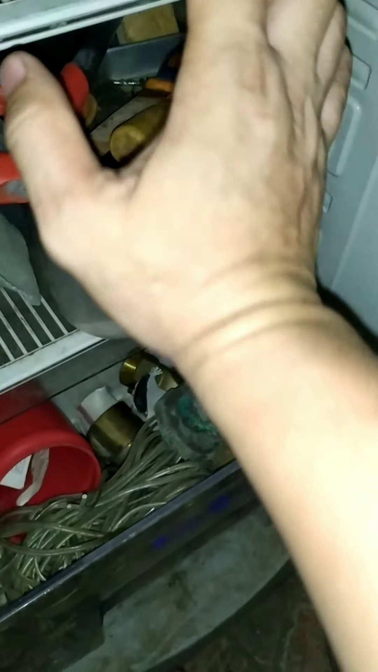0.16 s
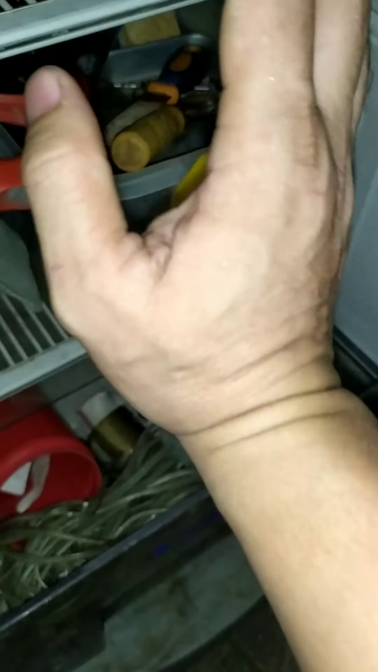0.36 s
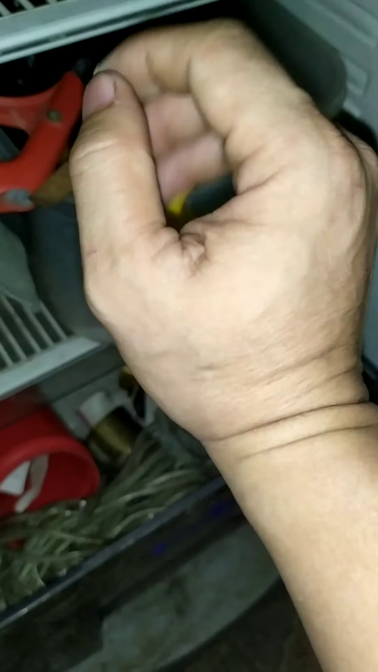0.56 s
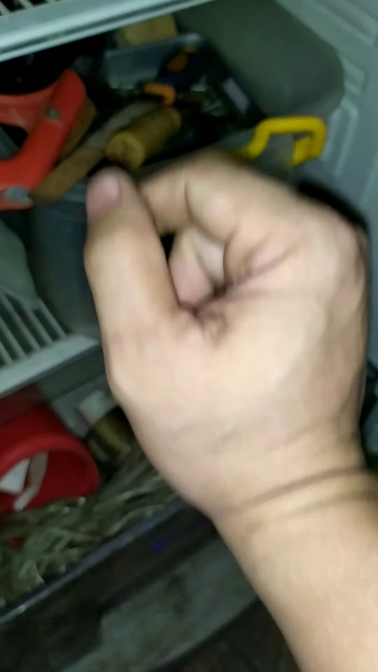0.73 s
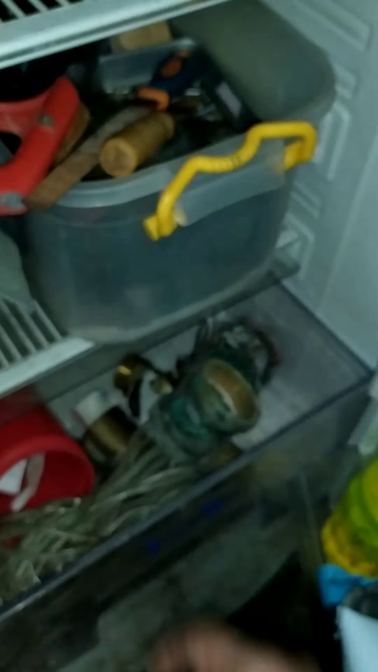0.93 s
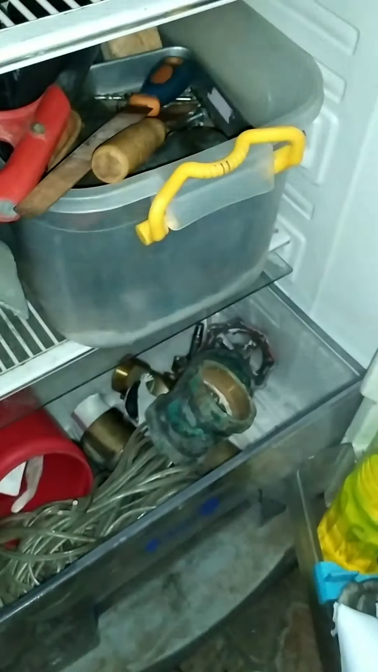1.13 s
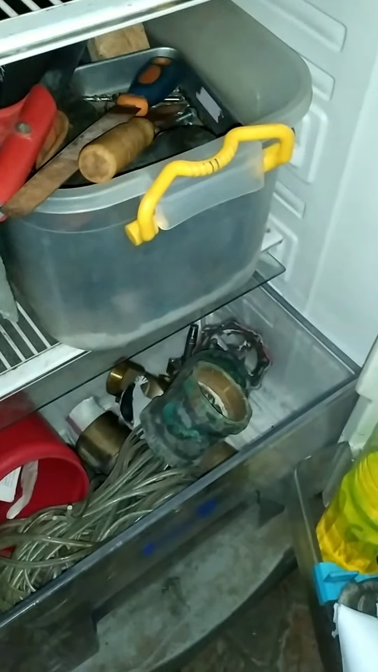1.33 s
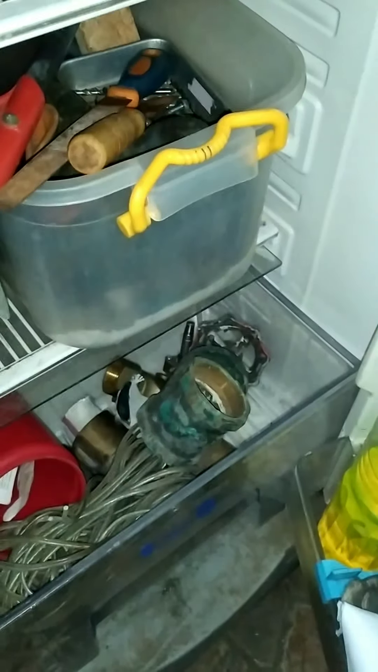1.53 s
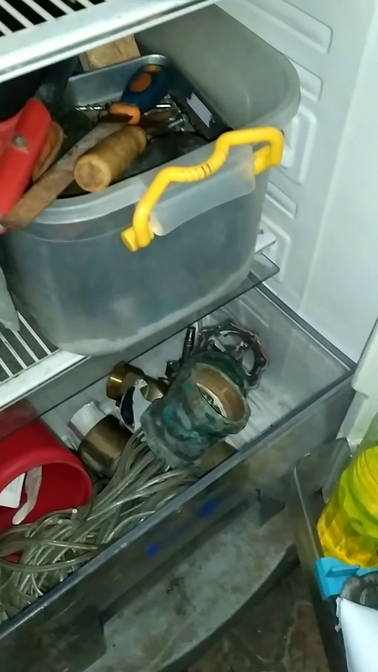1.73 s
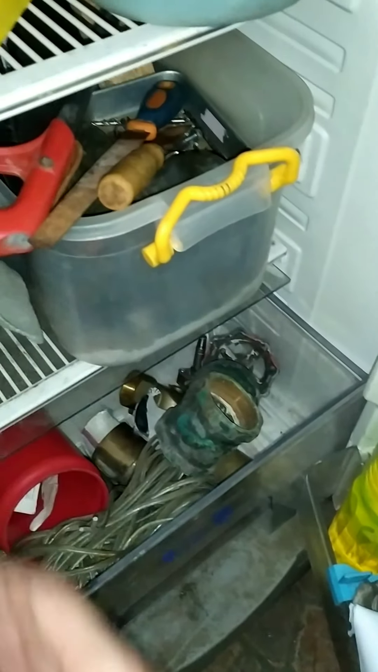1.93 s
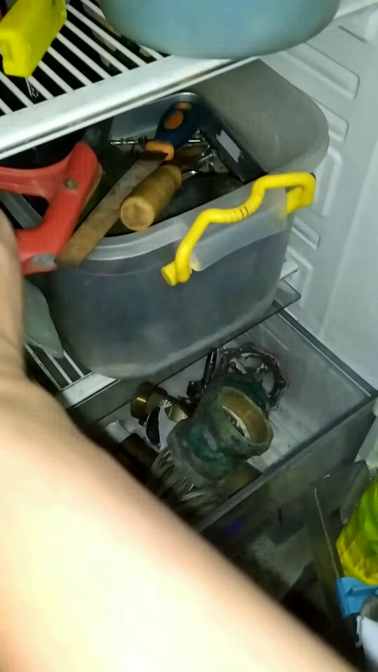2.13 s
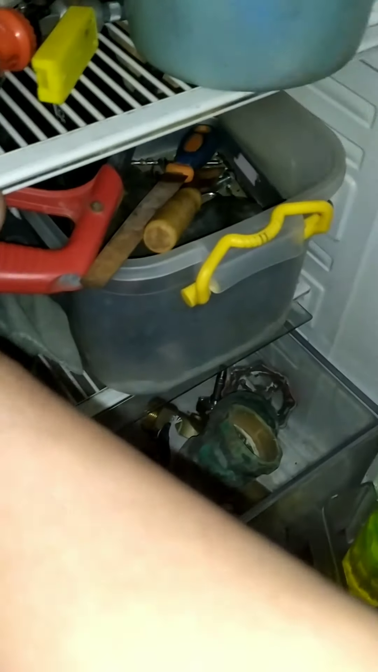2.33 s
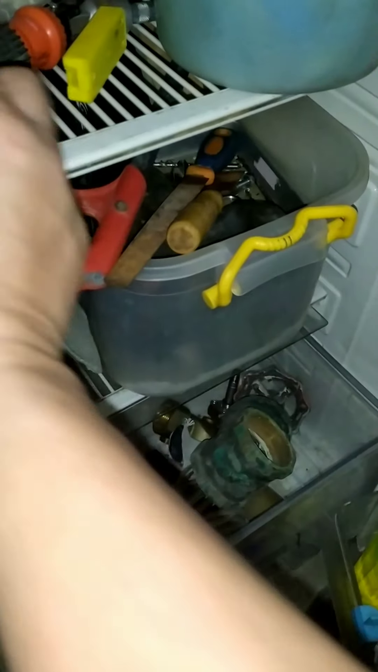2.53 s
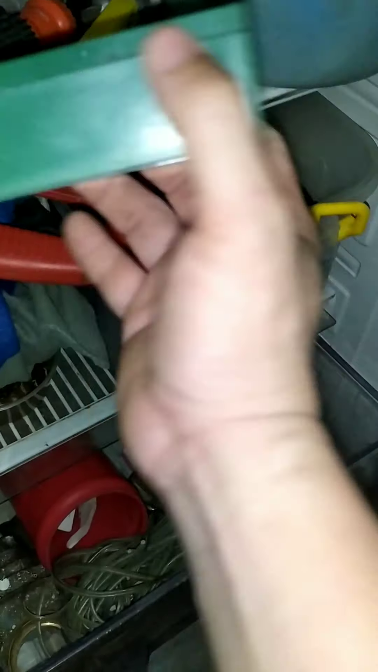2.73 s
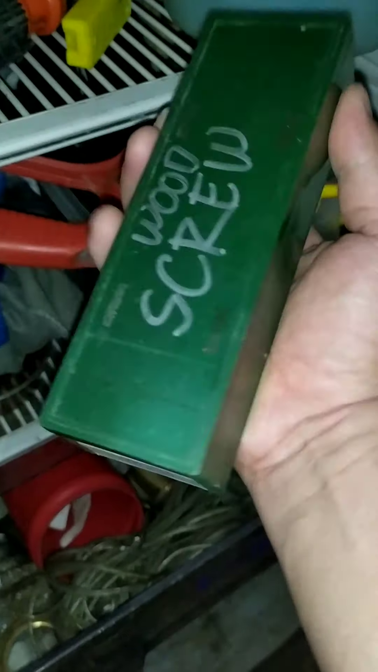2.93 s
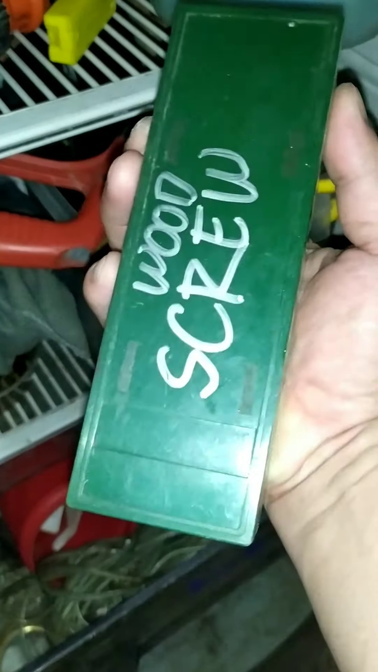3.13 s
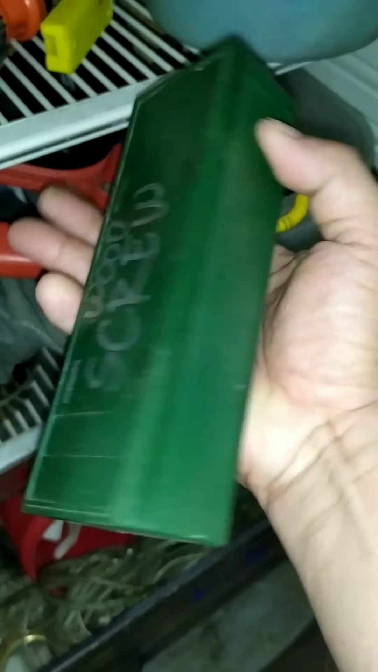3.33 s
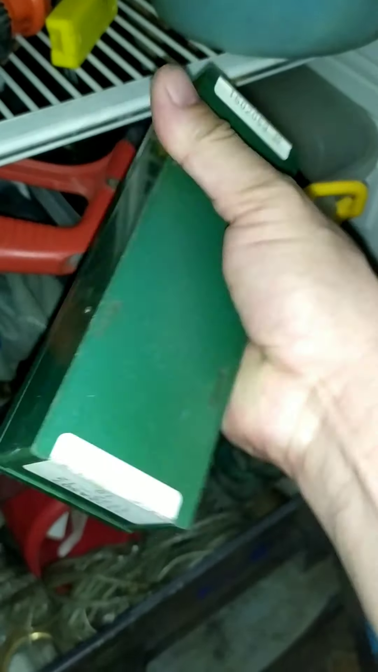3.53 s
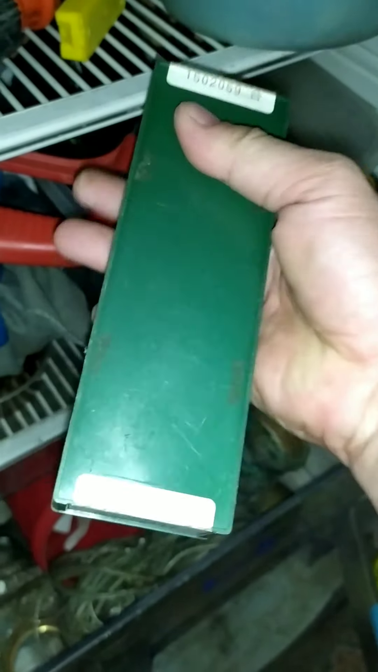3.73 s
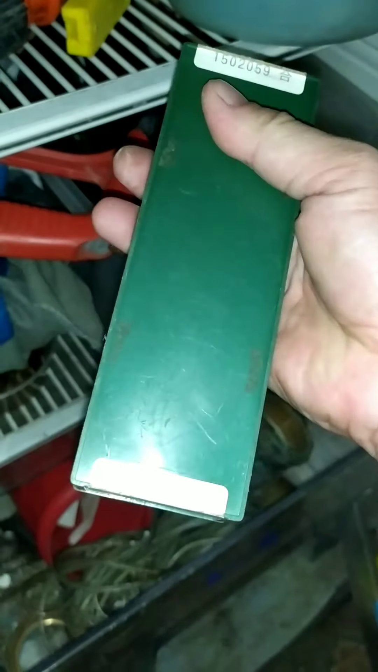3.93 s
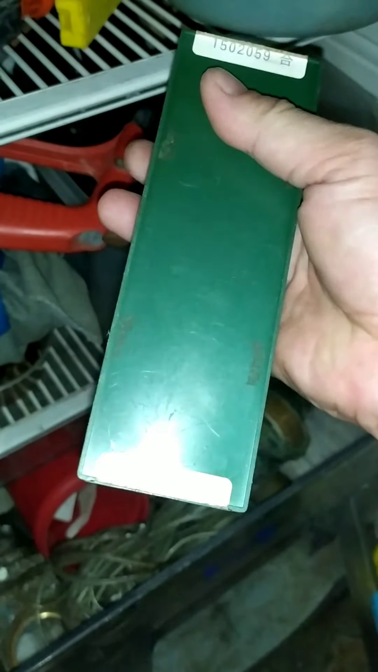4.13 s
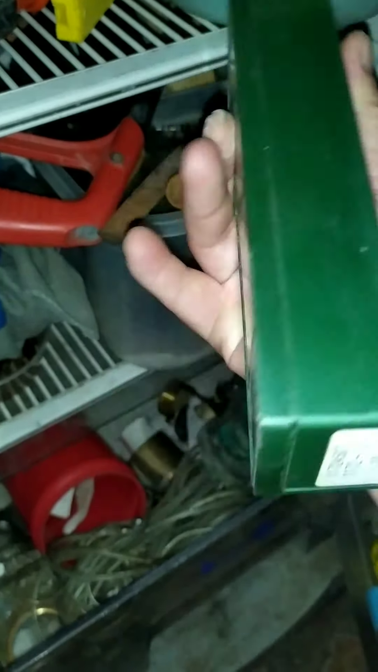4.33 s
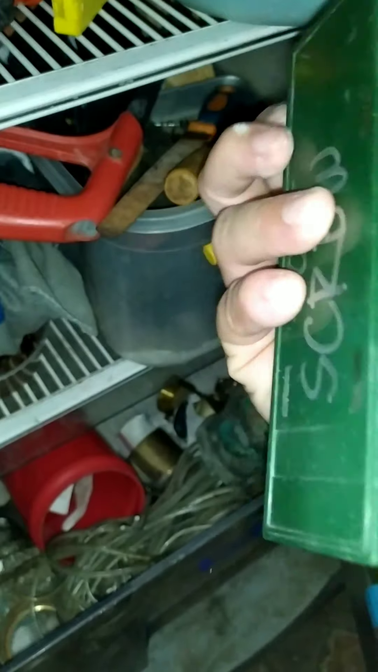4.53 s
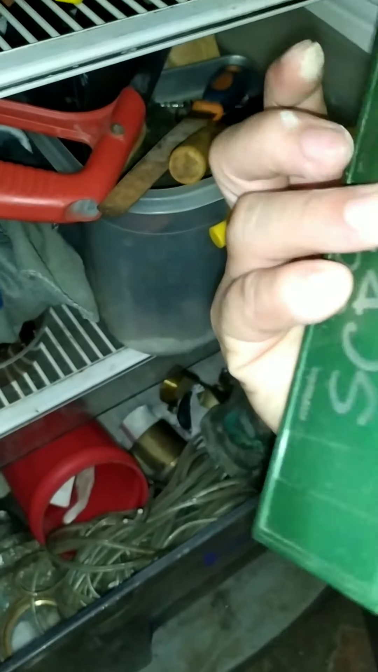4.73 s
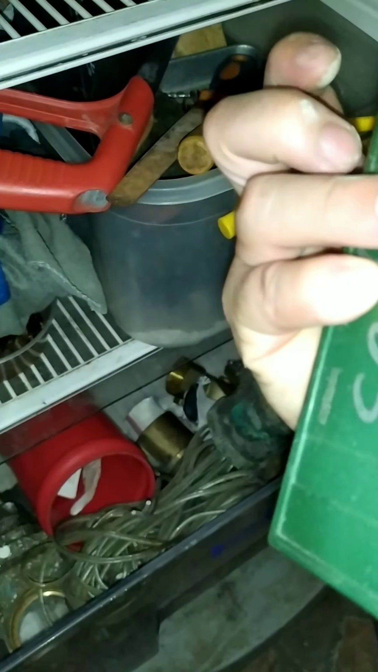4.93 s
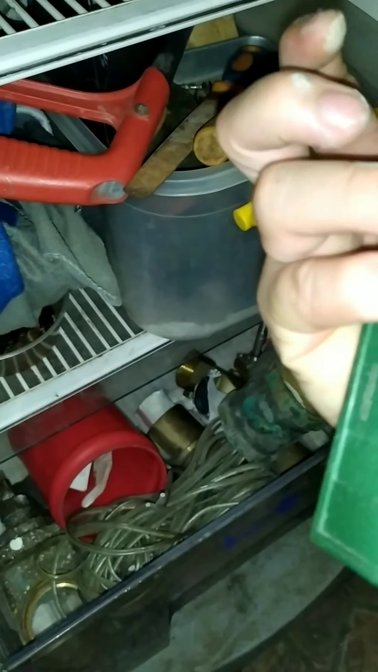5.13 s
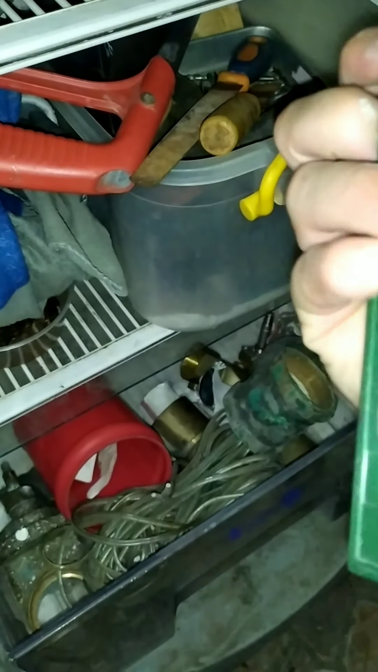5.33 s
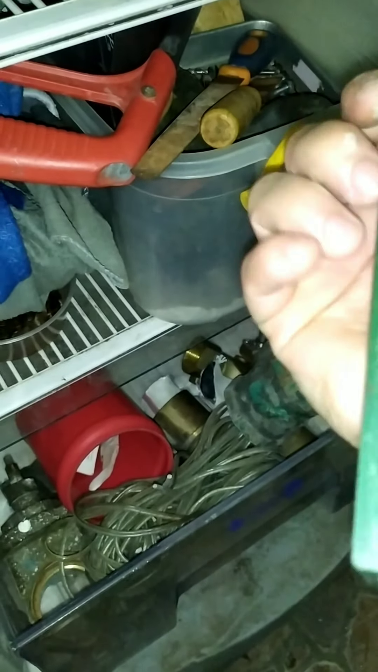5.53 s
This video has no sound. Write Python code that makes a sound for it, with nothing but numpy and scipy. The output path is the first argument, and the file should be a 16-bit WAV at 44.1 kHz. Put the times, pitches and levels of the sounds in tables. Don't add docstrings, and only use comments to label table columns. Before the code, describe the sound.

Hard plastic knocks and jostling tools, a faint squeak, then a long box of screws rattling loudly in two bursts.

```python
import sys
import numpy as np
from scipy import signal
from scipy.fft import rfft, irfft
from scipy.io import wavfile
from scipy.ndimage import uniform_filter1d

SR = 44100
rng = np.random.default_rng(int(sys.argv[2]) if len(sys.argv) > 2 else 0)


def transcribe(signal):
    frames = np.atleast_2d(signal).T
    limited = np.clip(frames, -1, 1)
    pcm = np.round(limited * 32767).astype(np.int16)
    wavfile.write(sys.argv[1], SR, pcm)


def how_loud(loudness_db):
    steps = np.asarray(loudness_db, float) / 20
    return 10 ** steps


N = 246078

# (frequency [Hz], density [dB per Hz])
HUM_COLOUR = [(15, -45), (25, -22.5), (59, -3.5), (116, -5.5), (143, -15), (316, -17.5), (347, -14.5),
              (437, -20), (839, -26.5), (3630, -34), (6500, -32), (8450, -65), (14300, -120)]
# (first [s], last [s], peak [dB], left-right [dB])
CHIRP_RUNS = [(.0282, .23, -38, -1), (.3672, .6687, -38.5, 3.5), (.7632, .8595, -38, 4),
              (.9595, 1.059, -38, 4), (1.1563, 1.254, -35, 4), (1.367, 1.467, -37, 2),
              (1.575, 1.575, -38, 2), (1.6775, 1.7768, -33.5, 2), (1.873, 1.969, -36, 3),
              (2.067, 2.1632, -37, 3), (2.2643, 2.458, -41, 6), (2.556, 3.04, -42, 2),
              (3.1394, 3.3304, -39.5, 1.5), (3.43, 3.82, -42, 1), (3.919, 4.303, -42, 2),
              (4.4, 4.886, -42, 1), (4.984, 5.3763, -39.5, .5), (5.474, 5.572, -41, 0)]
# (time after start [s], level [dB])
WING_STROKES = [
    (-.0135, -15),
    (0, 0),
    (.0165, 3.5),
]
# (delay [s], level [dB])
WALL_ECHOES = [
    (0, 0),
    (.0036, -7),
    (.011, -12),
    (.017, -18),
    (.025, -16),
]
# (time [s], pitch [Hz], level [dB])
SQUEAKS = [
    [(1.38, 11100, -80), (1.432, 12880, -72), (1.454, 13450, -72), (1.5, 13000, -71), (1.538, 12650, -72),
     (1.572, 12800, -73), (1.62, 11250, -72), (1.658, 10060, -74), (1.69, 9000, -80)],
    [(1.79, 9920, -72), (1.818, 10280, -71), (1.864, 10950, -76), (1.915, 11000, -75), (1.975, 11800, -77),
     (2.02, 11550, -79), (2.06, 11200, -84)],
]
# (pitch ratio [1], level [dB])
SQUEAK_STRANDS = [
    [(1, 0), (1.085, -5), (.76, -8)],
    [(1, 0), (1.165, -3), (.935, -5)],
]
# (time [s], peak [dB], t60 [s])
SHELF_THUDS = [(.095, -23, .085), (.13, -22, .14), (.177, -30.5, .12), (.225, -35, .09),
               (.264, -25.5, .047), (1.266, -45, .13), (2.331, -48, .16), (2.392, -42, .23),
               (2.462, -44, .2), (2.481, -36, .08), (2.56, -41, .3), (2.59, -41, .2), (2.615, -42, .1),
               (2.7, -43, .09), (2.742, -23, .18), (2.798, -24, .07)]
# (time [s], peak [dB], frequency [Hz])
PANEL_BOOMS = [(.087, -17, 234), (.099, -21, 264), (.128, -14, 264), (.135, -17.5, 277), (.175, -21.5, 266),
               (.227, -25, 277), (.244, -31, 253), (1.274, -45, 229), (2.58, -46, 240), (2.6, -44, 600),
               (2.65, -45, 640), (2.7, -45, 620), (3.5, -33, 230), (3.56, -35, 250), (4.45, -40, 240),
               (4.55, -41, 250), (2.741, -28, 540), (2.743, -32, 300), (2.752, -31, 390), (2.744, -30, 680),
               (2.964, -46, 620), (3.555, -17, 1470), (3.564, -18, 1500), (3.571, -20, 1440),
               (.09, -27, 720), (.099, -29, 600), (.176, -29, 680), (.231, -35, 520), (3.49, -24, 560),
               (4.382, -33, 420), (4.72, -33, 450), (3.64, -35, 235), (3.7, -38, 260), (4.75, -36, 215),
               (5.365, -55, 800), (3.481, -21.5, 549), (3.512, -19.5, 595), (3.624, -26.5, 600),
               (4.423, -30.5, 536), (4.426, -27, 1050), (4.691, -38, 530), (4.744, -33.5, 533),
               (4.906, -40.5, 269), (5.563, -33, 541)]
# (peak time [s], peak [dB], swell [s per 60 dB], fade [s per 60 dB])
HAND_RUBS = [
    (1.285, -56, .04, .35),
    (1.315, -54, .2, .3),
    (1.355, -60, .2, .03),
    (5.17, -65, .1, .1),
    (5.38, -60, .2, .4),
    (.424, -52, .04, .06),
    (2.478, -50, .06, .08),
    (2.58, -46, .3, .4),
]
# (frequency [Hz], density [dB per Hz])
RUB_COLOUR = [(150, -10), (700, -13), (1500, -15), (6000, -11), (10000, -6), (15000, -3), (16000, -20)]
# (time [s], peak [dB], ring [Hz], t60 [s], left-right [dB])
KNOCKS = [(0.0424, -49, 2200, 0.032, 3.5), (0.0862, 2, 3800, 0.032, -5), (0.1044, -20.5, 4200, 0.07, 4.5),
          (0.1275, -19, 1300, 0.03, 0), (0.1315, -12, 2800, 0.033, -6), (0.0885, -10, 2500, 0.03, 0),
          (0.1915, -18, 3700, 0.03, 0), (0.2312, -10, 2700, 0.025, 0), (0.1745, 0, 3650, 0.033, -0.5),
          (0.2259, -9.5, 3700, 0.043, -4), (0.2404, -14, 2946, 0.035, -8.5), (0.256, -26, 4400, 0.04, 0),
          (0.2824, -27, 2900, 0.04, -0.5), (0.2932, -23, 4900, 0.025, -3.5), (0.13, -20, 2000, 0.03, 0),
          (0.158, -33, 3000, .04, 0), (0.204, -28, 3500, .04, 0), (0.271, -25, 3600, .04, 0),
          (1.27, -37, 1600, 0.1, 3)]
# (frequency [Hz], density [dB per Hz])
TUB_COLOUR = [(180, -27.5), (300, -10), (400, -19), (943, -22), (1930, -18.5), (2600, -10.5), (3120, -12.5),
              (3800, -9), (5300, -16), (10300, -15), (14400, -19), (15900, -34.5)]
# (peak time [s], peak [dB], swell [s per 60 dB], fade [s per 60 dB])
TUB_JOSTLE = [
    (.086, -19, .012, .21),
    (.176, -17, .02, .075),
    (.23, -20, .04, .13),
    (.28, -34, .2, .17),
    (.19, -30, .05, .25),
    (.3, -41, .1, .12),
    (.35, -53, .2, .2),
]
# (peak time [s], peak [dB], swell [s per 60 dB], fade [s per 60 dB])
SCREW_SLIDES = [(2.51, -43, .08, .6), (2.64, -34, .4, .9), (2.744, -22.5, .02, .11), (2.8, -42, .3, .8),
                (2.94, -41, .9, .1), (2.968, -18, .06, .35), (3.05, -22, .3, .07), (3.128, -32.5, .3, .125),
                (3.22, -46, .05, .13), (3.386, -32.5, .085, .9), (3.488, -10.5, .04, .47),
                (3.562, -11.5, .25, .26), (3.645, -14, .05, .4), (3.685, -22, .2, .25),
                (3.73, -25, .2, .25), (3.82, -31, .4, .26), (4.372, -25, .03, .9), (4.412, -19, .14, .15),
                (4.685, -26, .3, .1), (4.432, -21.5, .13, .42), (4.535, -20, .15, .48), (4.61, -25, .3, .3),
                (4.742, -20, .5, .05), (4.78, -26.5, .3, .04), (4.33, -52, .08, .3), (4.871, -37, .3, .05),
                (4.89, -33, .03, .03), (4.96, -57, .48, .2), (5.42, -55, .35, .3), (5.484, -33, .08, .4),
                (5.575, -24, .06, .3)]
# (frequency [Hz], density [dB per Hz])
BOX_COLOUR = [(88, -46.5), (150, -32), (254, -19), (465, -17), (599, -9), (1010, -16.5), (1500, -3.5),
              (1680, -8.5), (2170, -0.5), (2600, -1.5), (3350, -7.5), (4380, -2), (9370, -15), (15900, -26)]
# (time [s], peak [dB],
# ring [Hz], left-right [dB])
DRAW_CLACKS = [(2.3815, -43.5, 1820, .5), (2.4017, -38, 2170, -6), (2.5339, -32, 1570, -2),
               (2.6346, -24.5, 1705, 6), (2.549, -36, 1300, 0), (2.569, -34, 1800, 0),
               (2.577, -34, 1250, 0), (2.596, -31, 1900, 0), (2.614, -30, 1400, 0), (2.671, -29, 1300, 0),
               (2.706, -27, 1250, 0), (2.723, -28, 1300, 0), (3.02, -12, 2400, 0), (2.6514, -26, 1830, -.5),
               (2.6886, -31, 2470, 3.5), (2.72, -27, 2470, 3), (2.742, -20.5, 2640, .5),
               (2.855, -12.5, 3760, -2.5), (2.757, -26, 2000, 0), (2.8251, -32, 3780, 0),
               (2.43, -42, 2000, 0), (2.465, -41, 1950, 0), (2.6984, -27, 2420, 3.5), (2.709, -27, 4500, 0),
               (2.9588, -18, 3740, .5), (3.058, -18, 2100, 0), (3.093, -26, 2050, .5),
               (2.8824, -24.5, 4170, -1.5), (2.9275, -29, 5100, 3.5), (2.9655, -3.5, 4230, 0),
               (2.9795, -5, 3300, 0), (3.24, -38, 2100, 0), (2.9746, -7, 4180, -10),
               (3.0052, -12, 2740, 2.5), (3.0298, -19, 2200, -4), (3.0523, -14, 1930, .5),
               (3.1171, -25.5, 2850, 3), (3.2164, -37, 2070, .5), (1.274, -37, 1740, -5),
               (1.2894, -35, 1710, -1)]
# (time [s], peak [dB], ring [Hz], left-right [dB])
TIP_CLACKS = [(3.3732, -29, 2120, 3), (3.381, -28, 2020, .5), (3.412, -14, 1970, 3.5),
              (3.4788, -10, 1400, 1), (3.4829, -11, 1330, 1.5), (3.431, -28, 2200, 0),
              (3.597, -12, 2300, 0), (3.609, -13, 2400, 0), (3.621, -17, 2200, 0), (3.886, -33, 3000, 0),
              (3.4863, -8, 2350, -8), (3.4915, -6, 2300, .5), (3.4968, -7, 2500, 0),
              (3.5028, -5.5, 1260, -1.5), (3.5147, -11, 1215, 2.5), (3.543, -3, 4420, 3),
              (3.5507, -4, 1567, 2), (3.5645, -4, 1530, 6.5), (3.5817, -10.5, 2250, 4),
              (3.5545, -5, 4500, 0), (3.5755, -8, 1500, 0), (3.6315, -3.5, 4980, 2.5),
              (3.642, -10, 2500, 1), (3.662, -14, 2500, 0), (3.674, -13, 2500, 0), (3.688, -19, 2500, 0),
              (3.7252, -9, 2400, 0), (3.7565, -13, 2300, 0), (3.767, -12, 2500, 0), (3.851, -26, 3600, 0),
              (3.6992, -9.5, 2480, -2), (3.7053, -9, 2470, -1.5), (3.7225, -9, 4630, -1.5),
              (3.7434, -8, 2480, -1), (3.764, -12, 2545, 3), (3.7775, -9, 2500, 0), (3.8018, -18, 2840, 4),
              (3.8159, -17, 2680, 0), (3.8374, -24, 3760, 5), (3.9658, -35.5, 2490, 5),
              (3.9867, -39, 3710, 6)]
# (time [s], peak [dB], ring [Hz], left-right [dB])
BACK_CLACKS = [(4.3352, -31, 2800, 12), (4.3696, -17, 2170, 3.5), (4.393, -17, 2480, .5),
               (4.4097, -15, 2590, -7.5), (4.4155, -11, 2500, 0), (4.4262, -7, 2060, 4),
               (4.4378, -5.5, 4220, 4), (4.4435, -8, 6500, 0), (4.5045, -13, 2300, 0),
               (4.468, -6, 2300, -1.5), (4.4845, -8, 2080, 0), (4.455, -14, 2300, 0), (4.59, -15, 2300, 0),
               (4.668, -22, 2200, 0), (4.803, -34, 2100, 0), (4.5245, -3.5, 4750, -1.5),
               (4.5375, -8, 1540, 5.5), (4.5555, -11, 2300, 0), (4.561, -10, 4270, 2),
               (4.5743, -9.5, 4700, 4.5), (4.6044, -12, 2310, 2), (4.6135, -14, 2200, 0),
               (4.6915, -13, 2300, 0), (4.7235, -12, 4300, 0), (4.735, -14, 2400, 0), (4.745, -12, 1900, 0),
               (4.779, -18, 3800, 0), (4.8701, -27, 2590, 4), (4.6331, -11, 2140, 2),
               (4.6776, -18, 2180, 3.5), (4.701, -11, 2955, 3), (4.6985, -3, 4300, -1.5),
               (4.718, -15, 4420, 5), (4.7704, -16.5, 1960, -2.5), (4.8369, -24, 2080, 0),
               (4.8477, -21.5, 2590, 2.5), (4.886, -14, 2790, 6), (5.3675, -38.5, 2030, -2.5),
               (5.4159, -32, 2210, 4), (5.4734, -37, 2380, 0), (5.479, -33, 2200, 0), (5.547, -36, 2300, 0),
               (5.4832, -17, 2090, 5.5), (5.5064, -18.5, 2140, 2.5), (5.5214, -21.5, 2230, 0),
               (5.5635, -25, 2590, -.5), (5.567, -24, 2300, 0), (5.5762, -8, 1900, 3)]
# (frequency [Hz], coherence [1])
PORT_LIKENESS = [(100, 0.93), (400, 0.75), (800, .75), (1500, 0.36), (3000, 0.24), (12000, .35)]
# (frequency [Hz], left-right [dB])
PORT_TILT = [(60, 1.5), (130, -2), (290, -1), (640, -4), (1410, 0.5), (3100, 4), (6820, -2), (15000, -3.5)]
PORT_LAG_S = -.00011


def evened(x):
    return x / np.sqrt(np.mean(x ** 2) + 1e-20)


def read(points, hz):
    f, value = np.transpose(points)
    return np.interp(np.log(hz + 1), np.log(f + 1), value)


def add(mix, at_s, sound):
    part = mix[:, round(at_s * SR):][:, :sound.shape[-1]]
    part += sound[..., :part.shape[1]]


def sides(pan_db):
    return how_loud(np.array([[.5], [-.5]]) * pan_db)


def fall(t, t60_s):
    return how_loud(-60 * t / t60_s)


def ports(pair, colour, lag_s=PORT_LAG_S):
    hz = np.fft.rfftfreq(pair.shape[1], 1 / SR)
    left, other = rfft(pair) * how_loud(read(colour, hz))
    same = np.clip(read(PORT_LIKENESS, hz), 0, 1)
    shift = np.exp(-2j * np.pi * hz * lag_s)
    right = same * shift * left + np.sqrt(1 - same ** 2) * other
    return irfft(np.array([left, right]), pair.shape[1])


def room(x, t60_s):
    t = np.arange(SR // 2) / SR
    tail = rng.standard_normal((2, len(t))) * fall(t, t60_s) * (t > .003)
    return signal.fftconvolve(x, tail / np.linalg.norm(tail[0]), axes=1)[:, :N]


def ring(hz, t60_s, rise_s, lag_s=PORT_LAG_S, size=6000):
    t = np.arange(size) / SR
    return np.sin(2 * np.pi * hz * (t - [[0], [lag_s]])) * fall(t, t60_s) * (1 - np.exp(-t / rise_s))


def surges(rows, s):
    at, db, swell, fade = np.array(rows).T[:, :, None]
    shape_db = db - 60 * np.where(s < at, (at - s) / swell, (s - at) / fade)
    return 10 * np.log10(np.sum(how_loud(shape_db) ** 2, axis=0) + 1e-14)


def hum():
    hiss = [(8200, -33), (8800, -55), (9900, -52), (10800, -41), (14500, -39), (16000, -42)]
    far_band = [(6000, -38.5), (6900, -14), (7300, -3), (7700, -4), (8100, -7), (8500, -24), (9200, -40)]
    floor = evened(ports(rng.standard_normal((2, N)), HUM_COLOUR[:-1] + hiss))
    far = evened(ports(rng.standard_normal((2, N)), far_band))
    return how_loud(-54.5) * floor + how_loud(-61) * far


def cricket():
    out, t = np.zeros((2, N)), np.arange(300) / SR
    glide = 2 * np.pi * np.cumsum(8020 - 140000 * t) / SR
    width_s = np.where(t < .0025, .0009, .0014)
    shape = np.exp(-.5 * ((t - .0025) / width_s) ** 2)
    gap_s = .098
    for first, last, run_db, pan_db in CHIRP_RUNS:
        for s in np.linspace(first, last, round((last - first) / gap_s) + 1):
            chirp_db = run_db + 1.1 * rng.standard_normal()
            for after_s, stroke_db in WING_STROKES:
                for late_s, echo_db in WALL_ECHOES:
                    echoed = late_s > 0
                    phase = (2 * np.pi if echoed else 2.8) * rng.random((2, 1))
                    wobble_db = echoed * 1.5 * rng.standard_normal((2, 1))
                    gain = how_loud(chirp_db + 1.6 + stroke_db + echo_db + wobble_db) * sides(pan_db)
                    start_s = max(s + after_s + late_s - .0008, 0)
                    add(out, start_s, gain * shape * np.sin(glide + phase))
    return out + how_loud(-6) * room(out, .15)


def hinge():
    out = np.zeros((2, N))
    for curve, strands in zip(SQUEAKS, SQUEAK_STRANDS):
        at, hz, db = np.transpose(curve)
        t = np.arange(at[0], at[-1], 1 / SR)
        for ratio, strand_db in strands:
            noise = rng.standard_normal((2, len(t)))
            waver, flutter = (evened(uniform_filter1d(v, size=200)) for v in noise)
            turns = np.cumsum(ratio * np.interp(t, at, hz) + 55 * waver) / SR
            level = how_loud(np.interp(t, at, db) + strand_db + 4.5 + 2.5 * flutter)
            fades = signal.windows.tukey(len(t), .15)
            add(out, at[0], level * fades * np.sin(2 * np.pi * turns))
    return out + how_loud(-6) * room(out, .06)


def thuds():
    out = np.zeros((2, N))
    shelf_hz, tub_t60_s, box_t60_s = 115, .048, .068
    for s, db, t60_s in SHELF_THUDS:
        add(out, s, how_loud(db + 6) * ring(shelf_hz, t60_s, rise_s=.006))
    for s, db, hz in PANEL_BOOMS:
        t60_s = tub_t60_s if hz < 400 else box_t60_s
        add(out, s, how_loud(db + 6) * ring(hz, t60_s, rise_s=.0015))
    return out


def rattle(rows, colour, per_s, spread_db, t60_s, boom_per_db, edge_per_db, count=11):
    out, t = np.zeros((2, N)), np.arange(1200) / SR
    size = how_loud(spread_db * np.minimum(rng.exponential(1, N), 4)) * (rng.random(N) < per_s / SR)
    clumps = evened(uniform_filter1d(rng.standard_normal(N), size=300))
    size *= how_loud(1.5 * clumps)
    kind = rng.integers(0, count, N)
    for k in range(count):
        hz = rng.uniform(150, 16000, (2, 16, 1))
        modes = np.sin(2 * np.pi * (hz * t + rng.random(hz.shape)))
        modes *= fall(t, t60_s * (3000 / hz) ** .61)
        out += signal.oaconvolve((size * (kind == k))[None], modes.sum(1), axes=1)[:, :N]
    hz, s, z = signal.stft(ports(out, colour), SR, nperseg=256)
    z /= np.sqrt(2 * np.sum(np.mean(abs(z[:, 6:38]) ** 2, axis=(0, 2))))
    force_db = np.clip(surges(rows, s), -60, 0) + 33
    wall = read([(600, 1), (1300, .0065)], hz)
    steel = read([(5500, .1), (10000, 1)], hz)
    z *= how_loud(np.outer(wall, boom_per_db * force_db) + np.outer(steel, edge_per_db * force_db))
    level = how_loud(np.repeat(surges(rows, np.arange(0, N, 16) / SR), 16)[:N])
    return signal.istft(z, SR, nperseg=256)[1][:, :N] * level


def clacks(rows, colour, ring_db, steel_db, rise_s, dull_per_db):
    out, t = np.zeros((2, N)), np.arange(2400) / SR
    spots = rng.random((len(rows), 7))
    onset = 1 - np.exp(-t / rise_s)
    snap = 1 + .8 * np.exp(-t / .0015)
    for (s, db, hz, t60_s, pan_db), spot in zip(rows, spots):
        lag_s = PORT_LAG_S + .00028 * (spot[0] - .5)
        dull_db = dull_per_db * min(db + 5, 0)
        felt = [(f, g + dull_db * max(np.log2(f / 4000), 0)) for f, g in colour]
        crack = evened(ports(rng.standard_normal((2, 2400)), felt, lag_s)) * fall(t, t60_s) * onset * snap
        walls = sum(ring(hz * (1 + .16 * (u - .5)), t60_s, rise_s, lag_s, 2400) for u in spot[1:4])
        steel = sum(ring(4500 + 10500 * u, 2.2 * t60_s, rise_s, lag_s, 2400) for u in spot[4:])
        crack_db = .15 * min(db + 22, 0)
        blow = how_loud(crack_db) * crack + how_loud(ring_db) * walls + how_loud(steel_db) * steel
        add(out, s, how_loud(db - 7) * sides(pan_db) * blow)
    return out


def tub():
    jostle = rattle(TUB_JOSTLE, TUB_COLOUR, 2500, 3.5, .0071, -.1, .1, count=5)
    knocks = clacks(KNOCKS[:-1], TUB_COLOUR, -5, -24, .00093, .01)
    return jostle + knocks + clacks(KNOCKS[-1:], BOX_COLOUR, -13, -24, .0023, .05)


def screws():
    tumble = rattle(SCREW_SLIDES, BOX_COLOUR, 2600, 1.6, .015, -.2, .4)
    blows = []
    for s, db, hz, pan_db in DRAW_CLACKS + TIP_CLACKS + BACK_CLACKS:
        t60_s = .031 * how_loud(.06 * (db + 15))
        blows.append((s, db, hz, t60_s, pan_db))
    return tumble + clacks(blows, BOX_COLOUR, -4.5, -28, .0005, .2)


def scene():
    rubs = rattle(HAND_RUBS, RUB_COLOUR, 5000, 1.5, .008, 0, 0, count=3)
    near = rubs + tub() + screws()
    return hum() + cricket() + hinge() + thuds() + near + how_loud(-15) * room(near, .1)


def low_pass(x):
    return signal.sosfilt(signal.butter(12, 16010, fs=SR, output="sos"), x)


def record(dry):
    hz = np.fft.rfftfreq(N, 1 / SR)
    edges_db = read([(25, -14), (50, -.5), (14900, .6), (15700, -11), (16200, -45)], hz)
    heard = irfft(rfft(dry) * sides(read(PORT_TILT, hz)) * how_loud(edges_db), N)
    heard = .98 * np.tanh(heard / .98)
    return low_pass(heard)


dry = scene()
out = record(dry)
transcribe(out)
```